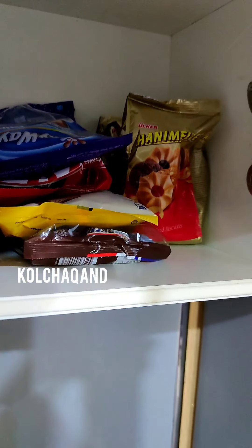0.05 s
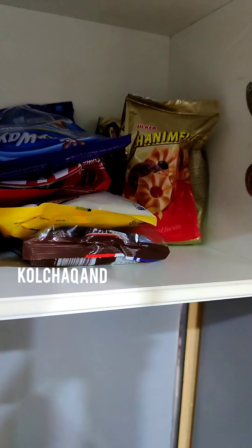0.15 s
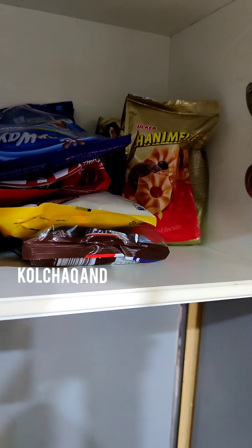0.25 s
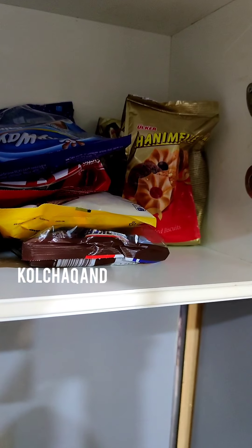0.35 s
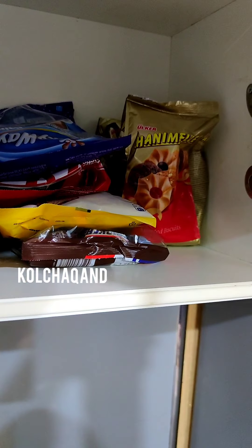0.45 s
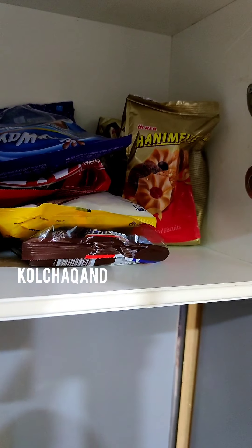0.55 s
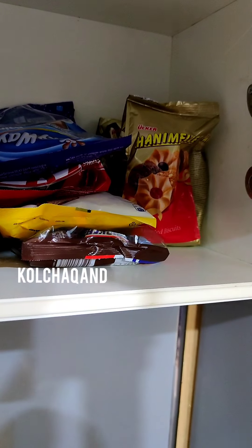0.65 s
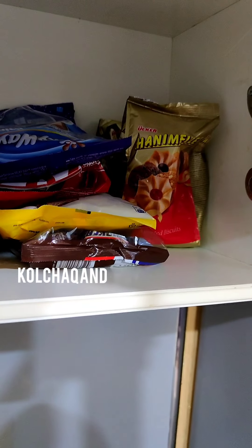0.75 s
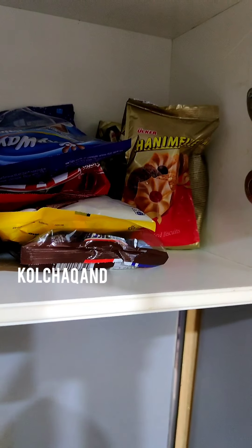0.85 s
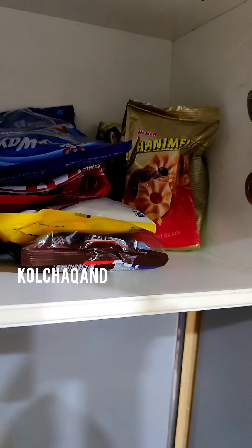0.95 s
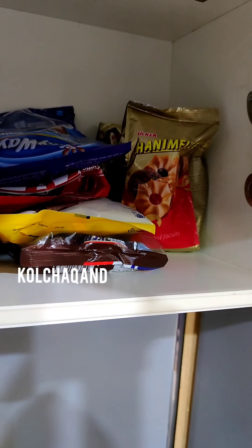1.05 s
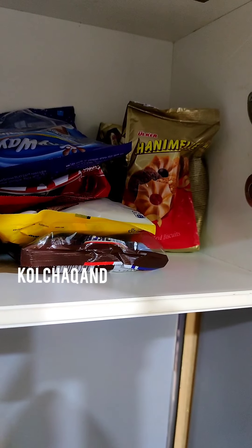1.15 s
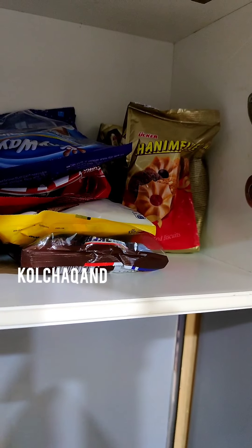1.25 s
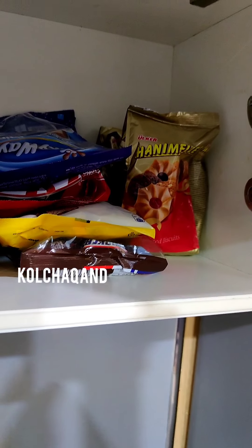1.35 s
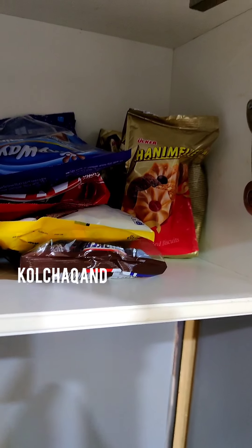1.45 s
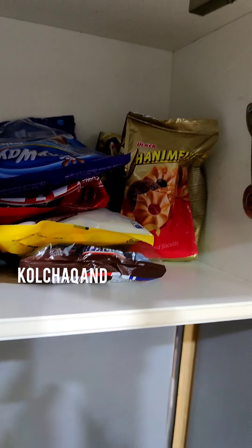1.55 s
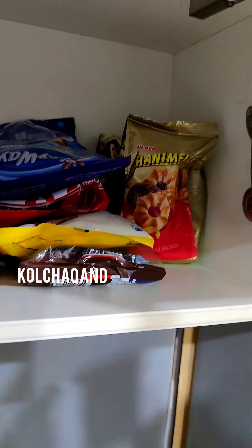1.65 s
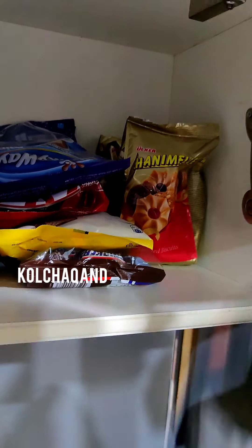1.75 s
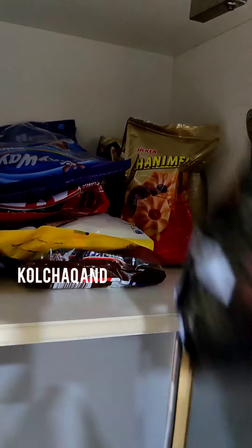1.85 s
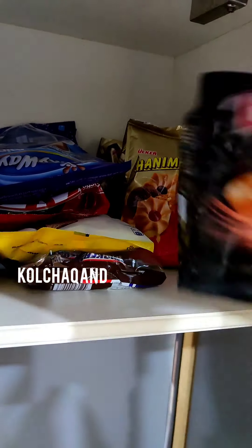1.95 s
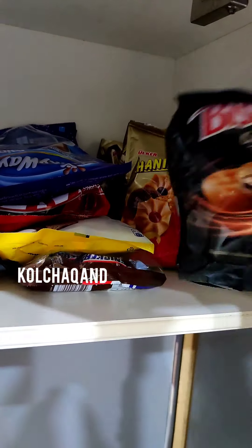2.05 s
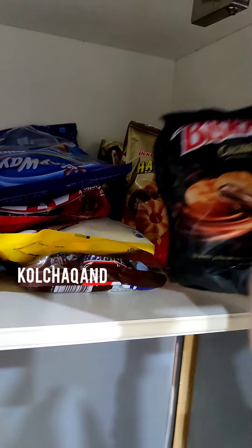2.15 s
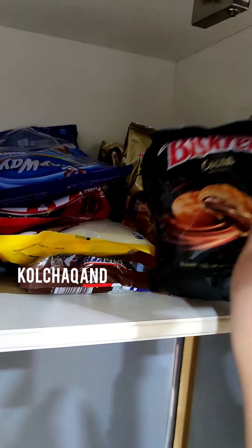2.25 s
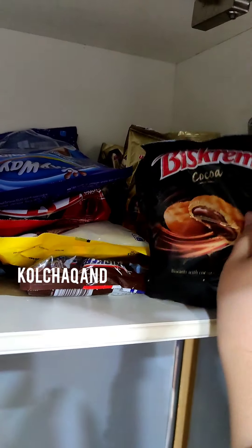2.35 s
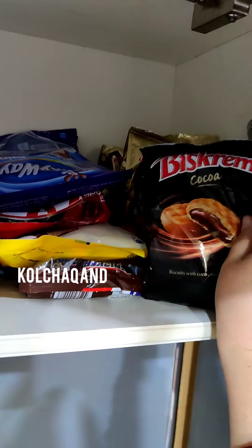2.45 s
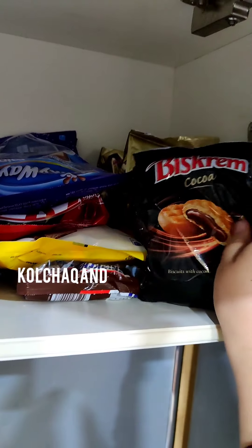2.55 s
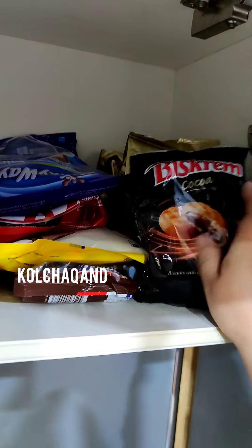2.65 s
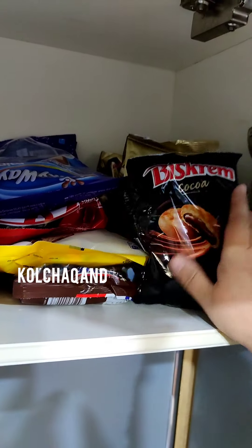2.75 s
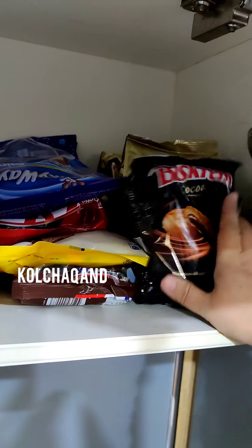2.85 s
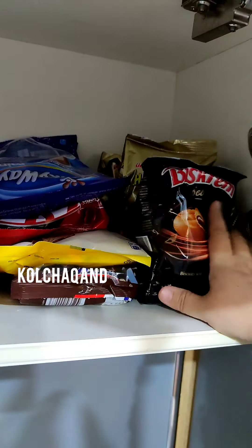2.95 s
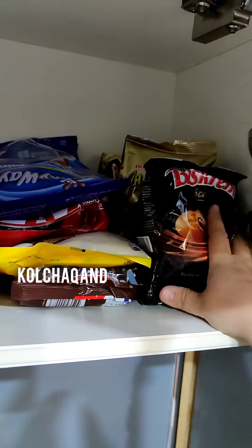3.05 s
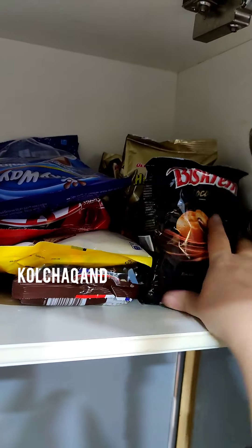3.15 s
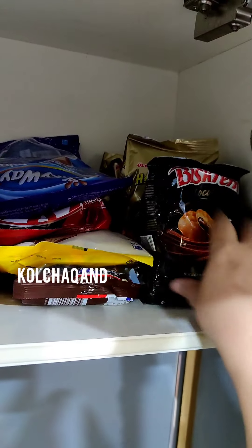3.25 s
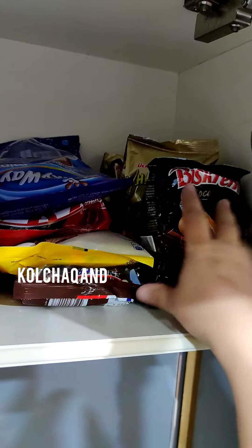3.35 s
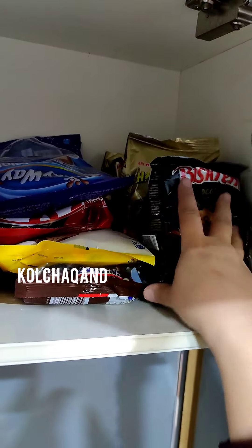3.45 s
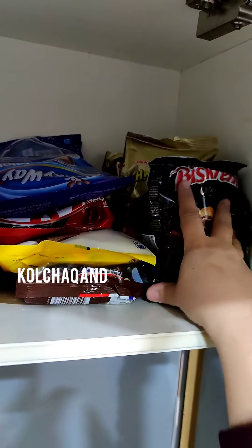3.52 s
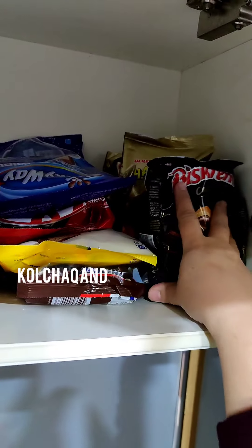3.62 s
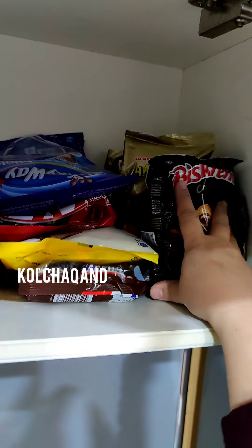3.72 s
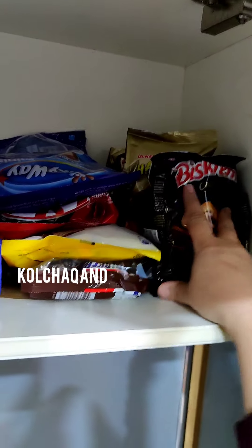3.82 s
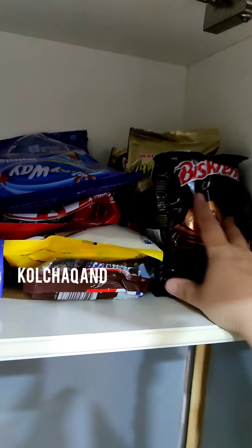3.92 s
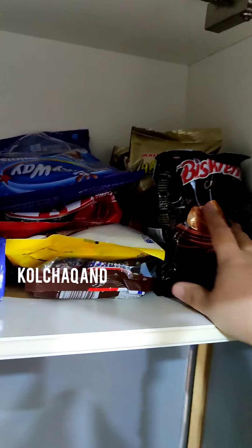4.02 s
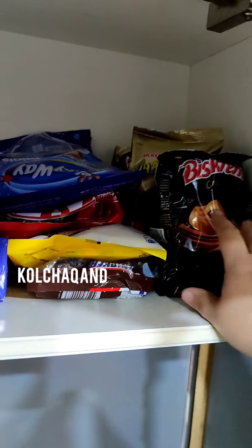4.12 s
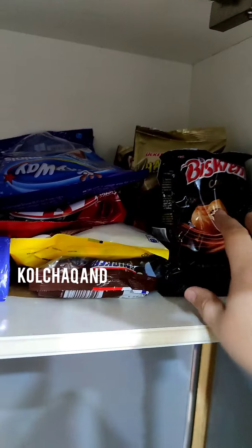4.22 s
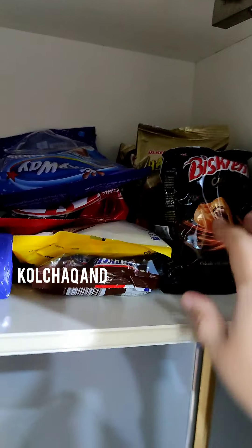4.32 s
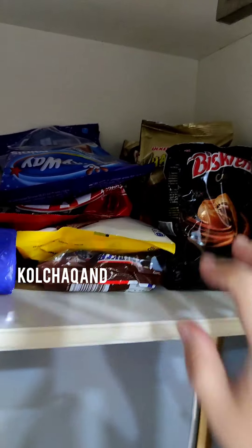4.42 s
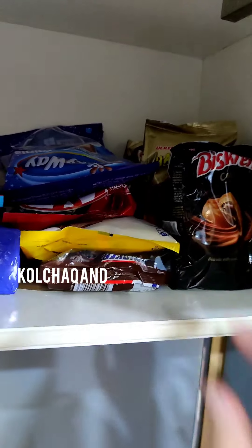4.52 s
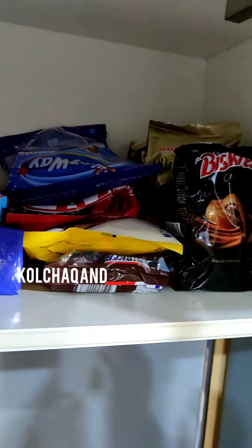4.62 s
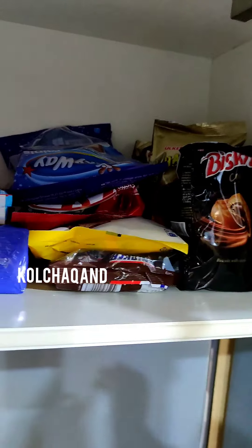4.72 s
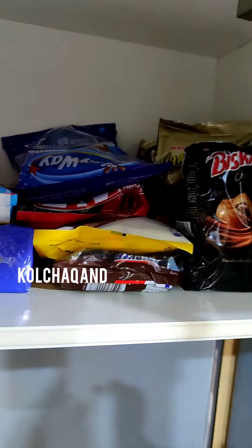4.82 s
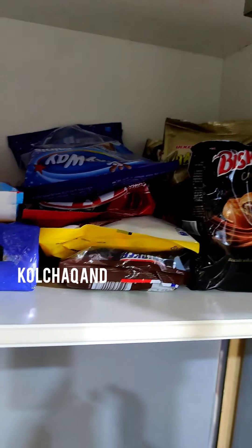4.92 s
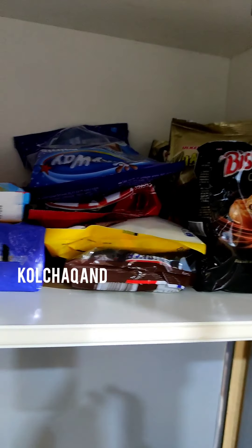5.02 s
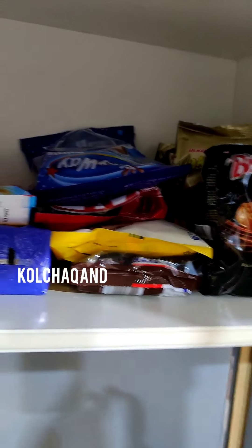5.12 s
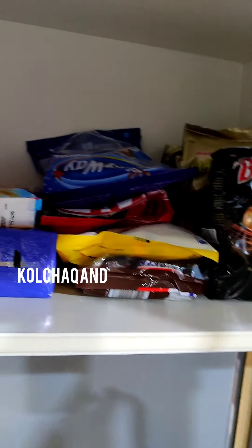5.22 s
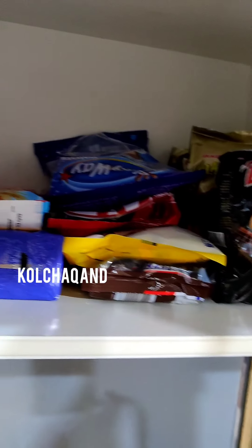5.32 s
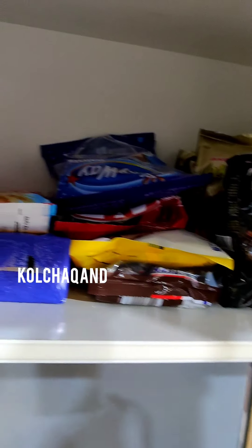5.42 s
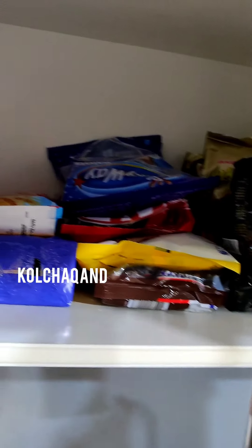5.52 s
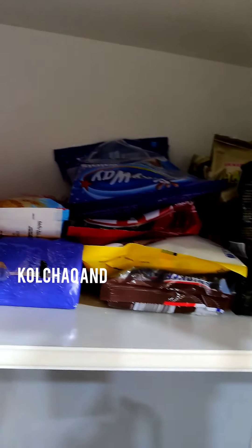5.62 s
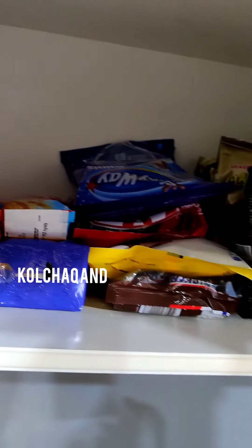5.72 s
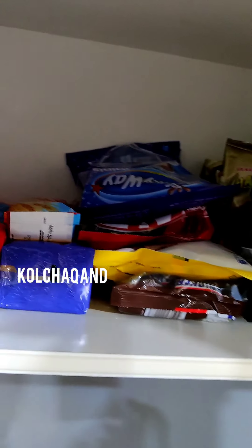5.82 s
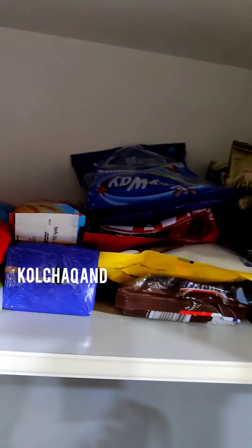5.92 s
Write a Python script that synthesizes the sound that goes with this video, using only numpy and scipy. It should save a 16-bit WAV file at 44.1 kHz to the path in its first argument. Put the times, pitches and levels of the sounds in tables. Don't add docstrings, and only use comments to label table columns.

```python
import sys
import numpy as np
from scipy import signal
from scipy.fft import rfft, irfft, next_fast_len
from scipy.io import wavfile
from scipy.ndimage import uniform_filter1d

SR = 44100
rng = np.random.default_rng(int(sys.argv[2]) if len(sys.argv) > 2 else 0)


def inscribe(sig):
    pcm = np.round(np.clip(np.atleast_2d(sig).T, -1, 1) * 32767)
    wavfile.write(sys.argv[1], SR, pcm.astype(np.int16))


def nominal_scale(level):
    x = np.asarray(level, float) / 20
    return 10 ** x


N = 263494
ECHO = 8192
ECHO_HZ = np.arange(ECHO // 2 + 1) * SR / ECHO + 1
POP = 4096


def in_time(rows, s):
    table = np.array(rows)
    return np.array([np.interp(s, table[:, 0], column) for column in table.T[1:]])


def at_hz(points, hz):
    table = np.array(points)
    return np.interp(np.log(hz), np.log(table[:, 0]), table[:, 1])


def causal(level_db):
    cepstrum = irfft(level_db * np.log(10) / 20, ECHO)
    cepstrum[..., 1:ECHO // 2] *= 2
    cepstrum[..., ECHO // 2 + 1:] = 0
    return np.exp(rfft(cepstrum))


def drift(rate):
    knots = rng.standard_normal(N // 100)
    return np.interp(np.arange(N) / SR * rate, np.arange(len(knots)), knots)


# (f/Hz, level/dB per Hz)
ROOM_SPECTRUM = [(15, -36), (30, 15), (52, 12.5), (68, 5), (202, -3), (257, 1.5), (353, -7), (414, 1),
                 (485, -2), (666, -8), (1070, -20.5), (1730, -25), (3530, -44.5), (7610, -72),
                 (11000, -28.5), (14000, -41.5)]
# (f/Hz, likeness 0..1)
ROOM_LIKENESS = [(60, 0.07), (240, 0.26), (950, 0.3), (3770, 0.019), (15000, 0.11)]


def quiet_room(level_db, flicker_db):
    mid, side = rfft(rng.standard_normal((2, N)))
    hz = np.arange(len(mid)) * SR / N + 1
    alike = np.clip(at_hz(ROOM_LIKENESS, hz), -1, 1)
    pair = np.sqrt(1 + alike) * mid + np.sqrt(1 - alike) * side * [[1], [-1]]
    hiss = irfft(pair * nominal_scale(at_hz(ROOM_SPECTRUM, hz)), N)
    return nominal_scale(level_db + flicker_db * drift(18)) * hiss / hiss.std()


# (t/s, level/dB)
FAR_RUSTLE = [(0, -71), (.62, -78.5), (.73, -88), (.77, -78), (2.2, -81.5), (3.4, -86), (4.15, -77),
              (5.97, -83.5)]
# (air, panels, foil) level/dB
FAR_COLOUR = (-1.5, 3, 5.5)
# (start t/s, hold t/s, panels level/dB, foil re panels level/dB, air re panels level/dB)
HAND_GRIPS = [(0.749, 0.046, -67, 5.5, -1), (0.913, 0.015, -71.5, 5.5, 7.5),
              (0.946, 0.11, -66.5, 14.5, 1.5), (1.04, 0.05, -65, 10, 11.5), (1.094, 0.095, -47, 4, -10.5),
              (1.158, 0.079, -47.5, 5, -0.5), (1.238, 0.082, -54.5, 4.5, 0), (1.317, 0.12, -42, -2, -3),
              (1.486, 0.34, -58.5, -4.5, -0.5), (1.849, 0.29, -69, -1.5, 4), (2.384, 0.052, -48.5, -5, 4),
              (2.468, 0.16, -46.5, -9, -0.5), (2.586, 0.036, -48, -3, -8), (2.645, 0.09, -45, -3.5, 1),
              (2.745, 0.055, -40, -5, -5), (2.852, 0.16, -43.5, -5.5, 0), (3.06, 0.056, -43, -11.5, -2),
              (3.17, 0.087, -42.5, -4, -4.5), (3.287, 0.014, -48, -9, 3), (3.446, 0.021, -49, -10.5, 3.5),
              (3.511, 0.076, -39, -3.5, 3), (3.616, 0.049, -38, 1.5, 1.5), (3.668, 0.093, -52, -22, 11.5),
              (3.767, 0.12, -62.5, -1, 8), (3.907, 0.1, -54, -8, 2)]


def handling(bite_s=0.0068, let_go_db_per_s=327.5, duller_db_per_s=-0.54):
    t = np.arange(N) / SR
    top_fade = np.array([[0], [0], [1]]) * duller_db_per_s * t
    far_db = in_time(FAR_RUSTLE, t) + np.array(FAR_COLOUR)[:, None] + top_fade
    power = nominal_scale(2 * far_db)
    for start, hold_s, level_db, foil_db, air_db in HAND_GRIPS:
        bite = np.clip((t - start) / bite_s, 0, 1)
        held = bite * nominal_scale(level_db - let_go_db_per_s * np.clip(t - start - hold_s, 0, 1))
        power = power + (held * nominal_scale(np.array([[air_db], [0], [foil_db]]))) ** 2
    return 10 * np.log10(power)


# (f/Hz, level/dB, t60/s)
CUPBOARD_MODES = [(181, -19.5, 0.22), (310, -19, 0.13), (387.7, -23.5, 0.19), (484, -14, 0.016),
                  (675.6, -15.5, 0.058)]
# (f/Hz, level/dB)
MICROPHONE = [(40, -45), (110, -12.5), (170, -4.5), (300, 2), (500, 3), (1800, 10.5), (3000, 6.5),
              (5500, 9.5), (8100, 14), (8900, 6), (14000, 7.5)]


def cupboard(count, burst_s, wall_db, wall_t60, room_db, room_t60, mode_db, tint_db):
    t = np.arange(ECHO) / SR
    shared, *own = rfft(rng.standard_normal((3, count, ECHO)) * (rng.random((count, ECHO)) < .5))
    bass = 1 / (1 + (ECHO_HZ / 1500) ** 4)
    grain = irfft(bass * shared + np.sqrt(1 - bass ** 2) * np.array(own), ECHO)

    lasting = burst_s * nominal_scale(rng.normal(0, 0.87, (count, 1)))
    crack = 0.38 * np.exp(-t / 0.000073)
    slips = grain * (np.exp(-t / lasting) + crack) * np.minimum(t / 0.000063, 1)
    slips /= np.sqrt(np.sum(slips ** 2, -1, keepdims=True))

    walls = nominal_scale(wall_db - 60 * t / wall_t60)
    room = nominal_scale(room_db - 60 * t / room_t60)
    tail = grain * (walls + room) * (t < t[-2000])
    for hz, level_db, t60 in CUPBOARD_MODES:
        struck = nominal_scale(mode_db + level_db + rng.normal(0, 1.5, (count, 1)))
        tail += struck * nominal_scale(-60 * t / t60) * np.sin(2 * np.pi * hz * t)
    dull_tail = rfft(tail) / (1 + 1j * ECHO_HZ / 6940)

    facets = np.geomspace(300, 15000, 16)
    tint = [np.interp(ECHO_HZ, facets, row) for row in rng.normal(0, tint_db, (count, 16))]
    torn = rfft(slips)
    chance_db = 10 * np.log10(uniform_filter1d(np.mean(np.abs(torn) ** 2, 0), size=70))
    return (torn + dull_tail) * causal(at_hz(MICROPHONE, ECHO_HZ) + tint - 0.76 * chance_db)


# (centre f/Hz, width f/Hz)
RUSTLE_BANDS = [(230, 330), (1050, 2050), (6000, 11500)]


def foil(level_db, per_s, size_db, clump_db):
    sizes_db = size_db * np.minimum(rng.exponential(1, N), 2.3)
    clumps_db = clump_db * np.minimum(drift(60), 1)
    sizes = nominal_scale(sizes_db + clumps_db) * rng.choice([-1, 1], N)
    clicks = sizes * (rng.random(N) < per_s / SR)
    effort_db = handling()
    grainy = np.clip((effort_db[1] + 64) / 10, .2, .93)
    push = np.sqrt(grainy) * clicks / clicks.std() + np.sqrt(1 - grainy) * rng.standard_normal(N)

    spots = cupboard(count=9, burst_s=0.0018, wall_db=-43, wall_t60=0.045, room_db=-73.5, room_t60=0.76,
                     mode_db=-30.0, tint_db=3.5)
    size = next_fast_len(N + ECHO)
    hz = np.arange(size // 2 + 1) * SR / size + 1
    centres = np.log(np.array(RUSTLE_BANDS)[:, 0])
    zones = [np.interp(np.log(hz), centres, row) * np.sqrt(SR / width)
             for row, (centre, width) in zip(np.eye(3), RUSTLE_BANDS)]
    dealt = rng.integers(0, 9, N)
    out = 0
    for k in range(9):
        driven = rfft(push * (dealt == k) * nominal_scale(effort_db), size)
        out = out + np.sum(driven * zones, 0) * rfft(irfft(spots[:, k], ECHO), size)
    duller = out / (1 + 1j * hz / 8000)
    return nominal_scale(level_db) * irfft(duller, size)[:, :N]


def snaps(rows, level_db, burst_s, tint_db, tilt_db, thump_db, panel_db):
    s, peak_db, pitch, air_db, body_db = np.array(rows).T[:, :, None]
    longer_if_loud = nominal_scale(0.055 * (peak_db - peak_db.mean()))
    spots = cupboard(count=len(s), burst_s=burst_s * longer_if_loud, wall_db=-33.5, wall_t60=0.089,
                     room_db=-45.0, room_t60=0.57, mode_db=-29.0, tint_db=tint_db)

    thump_top_hz, panel_top_hz = 435, 2100
    bump = np.exp(-.5 * (np.log2(ECHO_HZ / pitch) / 0.64) ** 2)
    tilt = tilt_db * np.log2(ECHO_HZ / panel_top_hz)
    fall = -1.5 * np.log2(np.maximum(ECHO_HZ / pitch, 1))
    crease = nominal_scale(2 * (5.5 * bump + tilt + fall))
    panel = nominal_scale(2 * (body_db + panel_db))
    thump = nominal_scale(2 * (np.minimum(air_db, -25 - peak_db) + thump_db))
    low, middle = (1 / (1 + (ECHO_HZ / hz) ** 8) for hz in (thump_top_hz, panel_top_hz))
    power = crease * (1 - middle) + panel * middle * (1 - low) + thump * low

    sounds = irfft(spots * causal(level_db + peak_db + 10 * np.log10(power + 1e-9)), ECHO)
    out = np.zeros((2, N + ECHO))
    for k, at in enumerate(((s[:, 0] + .0006) * SR).astype(int)):
        out[:, at:at + ECHO] += sounds[:, k]
    return out[:, :N]


# (t/s, peak
# level/dB, crease f/Hz, air thump re crease level/dB, panel re crease level/dB)
PICK_UP_AND_CARRY = [(0.5878, -44, 7330, -18, -17), (0.751, -43, 7850, -14, -15), (0.7688, -47, 7260, -22, -24),
                     (0.8008, -35.5, 7400, -14, -20), (0.854, -41, 7310, -12, -21), (0.955, -40.5, 7930, -26, -21),
                     (0.9824, -29, 7200, -22, -25.5), (1.0342, -28.5, 8000, -9.5, -27.5),
                     (1.067, -35.5, 7600, -6, -11.5), (1.0993, -24.5, 2100, -12.5, -8),
                     (1.1107, -14, 6260, -13, -21.5), (1.1394, -22, 2070, -32, -7.5), (1.1642, -8, 2075, -9.5, -17),
                     (1.2125, -21.5, 7270, -26, -20.5), (1.2311, -12, 2670, -41, -40.5),
                     (1.302, -38.5, 7350, -12.5, -22),
                     (1.3322, -20, 2000, -11, -12.5), (1.3451, -21, 7090, -33, -12), (1.3536, -7, 7300, -18, -15),
         (1.3953, -21.5, 2050, -3, -0.5), (1.4087, -26.5, 2200, -20, -24), (1.4354, -14, 6900, -41, -26),
         (1.4581, -14, 5540, -9, -11.5), (1.4891, -18, 4030, -12, -17), (1.5244, -16, 4830, -17, -16.5),
         (1.5567, -19, 7050, -25, -15.5), (1.6048, -28, 2530, -16, -19), (1.6393, -20, 2050, -31, -14),
         (1.704, -28.5, 7290, -34, -17), (1.716, -18.5, 7300, -19.5, -8.5), (1.761, -20, 3900, -24, -6),
         (1.9558, -20, 5070, -34, -12), (1.9924, -22, 2100, -46, -17), (2.018, -45.5, 12000, -30, -30),
         (2.022, -32.5, 6900, -25, -36), (2.059, -42, 2010, -20, -1.5), (2.072, -28.5, 6360, -41, -20),
         (2.128, -44, 8000, -25, 0.5), (2.2221, -28.5, 3740, -42, -15), (2.3119, -16.5, 8600, -16, -9.5)]
PUSH_IN = [(2.2447, -47, 6830, -2, -30), (2.392, -23.5, 5870, -20, -20), (2.4076, -21.5, 3100, -26, -10.5),
           (2.4727, -20, 4100, -32, -8.5), (2.487, -36.5, 4980, -14, -9), (2.5309, -21, 3100, -11, -3.5),
           (2.5433, -14.5, 2100, -10, -16.5), (2.597, -13.5, 2220, -5.5, -4.5),
           (2.632, -22, 7000, -19, -14), (2.6406, -15, 2900, -25, -8.5), (2.6591, -16.5, 7800, -16, -15),
           (2.6684, -26, 2000, 3, 5.5), (2.6894, -16, 7560, -20, -10), (2.7097, -35.5, 5560, -30, -20),
           (2.7412, -19.5, 7700, -30, -10), (2.7507, -16, 5700, -16, -24.5), (2.794, -25.5, 4910, 4, -9.5),
           (2.8112, -11.5, 5550, -17, -20.5),
           (2.8545, -19, 3850, -36, -7), (2.8731, -17, 2020, -38, -6), (2.8934, -30, 3680, -8, 1.5),
          (2.914, -20, 2340, -33, -15.5), (2.9388, -19.5, 5820, -15, -16), (2.9518, -8, 2760, -29.5, -15),
          (2.9721, -12, 2230, -48, -18.5), (3.0072, -11.5, 9200, -30, -10.5),
          (3.038, -18, 2020, -33, -18.5), (3.0567, -20.5, 2000, -24, -6.5), (3.0836, -18.5, 2000, -5, -4.5),
          (3.0934, -10.5, 2120, -27.5, -23), (3.115, -18, 2050, -12, -17), (3.1658, -20, 2140, 7, -11),
          (3.1945, -10.5, 2760, -22, -18.5), (3.2137, -19, 3000, -22, -11), (3.3093, -23.5, 4500, -10, -4)]
PRESS = [(3.4590, -29, 2020, -2, 0.5), (3.477, -27.5, 2120, 5, 0), (3.496, -20, 4570, 6, -12),
         (3.5098, -13, 2720, -9, -15), (3.5323, -10.5, 4280, 4, -6), (3.553, -23, 3530, -22.5, -10),
         (3.576, -17.5, 3020, 5, -12.5), (3.5912, -6.5, 2620, -19.5, -18.5), (3.6188, -17, 4320, -4, -18.5),
         (3.6377, -13.5, 5260, -11, -8.5), (3.6515, -19.5, 1990, 0, -0.5), (3.6633, -11.5, 2100, -17, -9.5),
         (3.6901, -12.5, 4110, -5, -2), (3.73, -13.5, 3060, -4.5, -9), (3.7598, -39, 3020, 0, -5),
         (3.784, -32, 2100, -8, -2), (3.8183, -28, 7700, -23.5, -3.5), (3.8539, -31, 2150, -35, -3.5),
         (3.862, -31.5, 4000, -28, -2), (3.9, -31.5, 2930, -3, -1), (3.9341, -21, 2930, -35, -12),
         (3.9434, -18.5, 8000, -33, -21.5), (3.9698, -20.5, 2920, -12.5, -14),
         (3.9939, -11, 4020, -35, -15.5)]


def crease_snaps():
    return snaps(PICK_UP_AND_CARRY + PUSH_IN + PRESS, level_db=1.3, burst_s=0.0026,
                 tint_db=2.0, tilt_db=-0.7, thump_db=28.5, panel_db=19.5)


def pops(rows, cycles, level_db, rise_cycles, echo_db, echo_t60):
    s, peak_db, hz = np.array(rows).T[:3, :, None]
    t = np.arange(POP) / SR
    swell = 1 - np.exp(-t * hz / rise_cycles)
    ring = swell * nominal_scale(-60 * t * hz / cycles) * np.sin(2 * np.pi * hz * t)
    ring *= nominal_scale(level_db + peak_db) / np.abs(ring).max(-1, keepdims=True)
    walls = rng.standard_normal((len(s), 2, POP)) * nominal_scale(echo_db - 60 * t / echo_t60) * (t < t[-1] / 2)
    walls[:, 1] = (walls[:, 0] + walls[:, 1]) / np.sqrt(2)
    walls[..., 0] = 1
    turn = 1j * np.arange(POP // 2 + 1) * SR / POP / 99
    sounds = irfft(rfft(ring)[:, None] * rfft(walls) * (turn / (1 + turn)) ** 2, POP)
    out = np.zeros((2, N + POP))
    for sound, at in zip(sounds, (s[:, 0] * SR).astype(int)):
        out[:, at:at + POP] += sound
    return out[:, :N]


# (t/s, peak level/dB, f/Hz)
PANEL_POPS = [(1.099, -19.5, 2100), (1.11, -15.5, 2060), (1.138, -21, 1960), (1.165, -12, 2220),
              (1.345, -32, 1600), (1.354, -14.5, 1670), (1.395, -25, 1920), (1.407, -26.5, 2200),
              (1.444, -28, 1680), (1.459, -14.5, 1560), (1.526, -31, 1540), (1.556, -23, 2100),
              (1.639, -28.5, 1310), (1.715, -25.5, 597), (1.761, -24, 724), (1.877, -38, 703),
              (1.956, -23.5, 900), (1.993, -18, 1440), (2.312, -20, 1180), (2.392, -25, 1110),
              (2.406, -24, 950), (2.473, -30.5, 706), (2.486, -23, 594), (2.53, -29, 1400),
              (2.544, -35, 730), (2.598, -26, 1460), (2.641, -22, 720), (2.668, -19, 885),
              (2.677, -19, 1770), (2.795, -12, 1490), (2.812, -6, 1700), (2.858, -12, 1850),
              (2.873, -37, 890), (2.894, -28, 624), (2.937, -18, 1470), (2.951, -20, 1770),
              (2.963, -21, 720), (3.007, -19, 1610), (3.084, -18.5, 790), (3.093, -24, 2100),
              (3.114, -11.5, 2000), (3.166, -27, 700), (3.195, -7.5, 1750), (3.308, -23, 1090),
              (3.46, -40.5, 724), (3.51, -15.5, 1430), (3.532, -26, 724), (3.582, -34, 545),
              (3.582, -21.5, 735), (3.638, -18, 730), (3.651, -14.5, 1230), (3.664, -12, 1043),
              (3.691, -25, 697), (3.73, -32, 1800), (3.761, -21, 1430), (3.783, -25, 1280),
              (3.854, -27, 1110), (3.934, -21, 1640), (3.994, -9.5, 1780), (4.144, -34.5, 950)]


def panel_pops():
    return pops(PANEL_POPS, cycles=12.3, level_db=-4.5, rise_cycles=0.19, echo_db=-29, echo_t60=.035)


# (t/s, peak level/dB, f/Hz, cycles of ringing)
AIR_BOOMS = [(1.101, -29, 440, 10), (1.168, -20, 411, 8), (1.353, -32.5, 405, 22), (1.395, -30.5, 396, 23),
             (1.456, -30.5, 377, 8.8), (1.712, -40.5, 283, 24), (2.404, -40.5, 378, 13),
             (2.481, -48, 380, 10), (2.541, -28, 302, 13), (2.595, -26, 400, 12), (2.664, -28.5, 296, 35),
             (2.775, -27.5, 311, 29), (2.846, -31, 310, 18), (3.066, -44.5, 312, 12),
             (3.165, -31, 307, 5.1), (3.31, -39, 310, 17), (3.457, -31, 301, 44), (3.527, -23, 202, 9.8),
             (3.554, -22.5, 305, 7.7), (3.639, -26.5, 385, 10), (3.65, -16, 312, 9.5),
             (3.727, -22, 192, 10), (3.969, -38.5, 296, 28)]


def air_booms():
    cycles = np.array(AIR_BOOMS)[:, 3:]
    return pops(AIR_BOOMS, cycles, level_db=0.5, rise_cycles=0.37, echo_db=-31.5, echo_t60=.06)


# (t/s, peak level/dB, f/Hz)
FACET_POPS = [(1.1119, -19, 5930), (1.1388, -20, 6710), (1.1663, -7.5, 5520), (1.2034, -18.5, 2840),
              (1.2111, -28, 2800), (1.2224, -15, 7200), (1.2309, -22, 2620), (1.3312, -20, 4890),
              (1.3444, -21, 7160), (1.353, -9, 7300), (1.4077, -10, 6900), (1.4351, -7.5, 7500),
              (1.457, -18, 5400), (1.5249, -34, 5170), (1.704, -27, 7290), (1.7168, -25, 2550),
              (1.7609, -9, 4330), (1.9574, -24, 5400), (2.0727, -20, 7440), (2.3121, -19, 8240),
              (2.393, -24, 5840), (2.409, -21, 7500), (2.4729, -8.5, 4400), (2.486, -16, 4920),
              (2.525, -23, 3940), (2.545, -25, 3950), (2.598, -11.5, 3830), (2.654, -21, 4100),
              (2.6594, -20, 7800), (2.6898, -28.5, 7400), (2.712, -19, 5560), (2.751, -19, 5730),
              (2.796, -15, 5000), (2.8122, -8.5, 5570), (2.8539, -12, 3800), (2.863, -12, 8000),
              (2.8733, -14.5, 4370), (2.913, -20, 6040), (2.937, -16, 5640), (2.972, -16, 3000),
              (3.0083, -31.5, 8010), (3.0914, -11.5, 4100), (3.1948, -18.5, 2780), (3.3073, -26, 4560),
              (3.5326, -2, 4740), (3.5895, -18.5, 2580), (3.6182, -22, 4320), (3.626, -23, 6960),
              (3.6376, -18, 4000), (3.6905, -9, 4070), (3.7308, -19.5, 3060), (3.9342, -34.5, 2930),
              (3.945, -15, 4000), (3.9943, -6, 7700), (4.4573, -28, 4770), (5.5653, -29.5, 3900)]


def facet_pops():
    return pops(FACET_POPS, cycles=24.0, level_db=-7.0, rise_cycles=1.0, echo_db=-28.5, echo_t60=0.027)


# (t/s, peak level/dB, f/Hz, air thump re tap level/dB, panel re tap level/dB)
PARTING_TAPS = [(4.0406, -34.5, 3570, -21, -8), (4.067, -35, 2060, -17.5, -26),
                (4.144, -32, 8600, -24, -20), (4.174, -36.5, 7640, -37, -12.5),
                (4.2505, -47, 7750, -22, -30), (4.4036, -36.5, 2110, -5.5, -1.5),
                (4.4569, -32.5, 4230, -14, -7.5), (4.5193, -51, 3980, -6, -7),
                (4.6855, -36.5, 4280, -10.5, -5.5), (4.7012, -45, 7890, -32, -14),
                (4.774, -43.5, 12500, -22, -29), (4.8735, -42.5, 2530, -29, -19),
                (5.0985, -46, 7170, -18, -8), (5.1952, -45.5, 2760, -27, -21), (5.2665, -68.5, 2440, 13, 3),
                (5.565, -41.5, 3780, -30, -10.5), (5.35, -55.5, 6100, -11, -22),
                (5.765, -56.5, 7870, -30.5, -23), (5.939, -47, 4400, -30, -16)]


def parting_taps():
    return snaps(PARTING_TAPS, level_db=4.0, burst_s=0.0013, tint_db=4.0, tilt_db=-2.0,
                 thump_db=36.5, panel_db=19.5)


# (t/s, peak level/dB)
SHELF_KNOCKS = [
    (4.404, -18.5),
    (5.2670, -46),
]
# (f/Hz, level/dB, t60/s)
SHELF_MODES = [(433, 5, 0.018), (627, -2.5, 0.064), (680, 9.5, 0.027), (1064, 8.5, 0.018), (1310, -7, 0.04),
               (2050, -15.5, 0.016), (3100, -18, 0.012), (4670, 13, 0.0095)]


def shelf_knocks(level_db, contact_s):
    t = np.arange(ECHO) / SR
    swell = 1 - np.exp(-(t / contact_s) ** 2)
    ring = sum(nominal_scale(mode_db - 60 * t / t60) * np.sin(2 * np.pi * hz * t) for hz, mode_db, t60 in SHELF_MODES)
    out = np.zeros(N)
    for s, peak_db in SHELF_KNOCKS:
        start = int(s * SR)
        out[start:start + ECHO] += nominal_scale(level_db + peak_db) * swell * ring
    return out


def shaded(x, shadow, colour, left_lag):
    hz = np.arange(N // 2 + 1) * SR / N + 1
    half = np.array([[.5], [-.5]])
    level = nominal_scale(half * at_hz(shadow, hz) + at_hz(colour, hz))
    delay = np.exp(-2j * np.pi * half * left_lag * hz / SR)
    return irfft(rfft(x) * level * delay, N)


# (f/Hz, left-right level/dB)
SHADOW_BELOW = [(60, 32), (180, 1.5), (550, -3), (1650, -3), (4970, 5), (15000, -1)]
# (f/Hz, level/dB)
OPEN_AIR = [(600, 0), (950, 0.5), (1400, 1.5)]
# (f/Hz, left-right level/dB)
SHADOW_INSIDE = [(60, 7), (150, -6.5), (380, 1.5), (950, -13), (2380, -3), (5980, 0), (15000, -3)]
# (f/Hz, level/dB)
SHELF_DIP = [(1900, -0.5), (2400, -3.5), (2900, 1.5)]


def scene():
    packet = crease_snaps() + parting_taps()
    packet += foil(level_db=-4.5, per_s=700, size_db=5.5, clump_db=3.5)
    packet += shelf_knocks(level_db=-7.5, contact_s=0.0025)
    packet += air_booms() + panel_pops() + facet_pops()
    inside = np.arange(N) / SR > 1.8
    below = shaded(packet * ~inside, SHADOW_BELOW, OPEN_AIR, left_lag=-15)
    within = shaded(packet * inside, SHADOW_INSIDE, SHELF_DIP, left_lag=14.32)
    return below + within + quiet_room(level_db=-61.5, flicker_db=.7)


def top_cut(x):
    return signal.sosfilt(signal.butter(12, 16470, fs=SR, output="sos"), x)


# (f/Hz, level/dB)
TOP_CUT = [(14300, 0), (14450, -70)]
# (f/Hz, level/dB)
SNAP_TOP = [(14400, -5), (16400, -30.5)]


def record(dry):
    dry = .9 * np.tanh(dry / .9)
    hz = np.arange(N // 2 + 1) * SR / N + 1
    body = irfft(rfft(dry) * nominal_scale(at_hz(TOP_CUT, hz)), N)
    top = irfft(rfft(dry - body) * nominal_scale(at_hz(SNAP_TOP, hz)), N)
    power = uniform_filter1d(np.sum(top ** 2, 0), size=256)
    surroundings = uniform_filter1d(power, size=4096)
    sharp = uniform_filter1d(1. * (power > 4 * surroundings), size=128)
    return top_cut(body + sharp * top)


dry = scene()
out = record(dry)
inscribe(out)
```